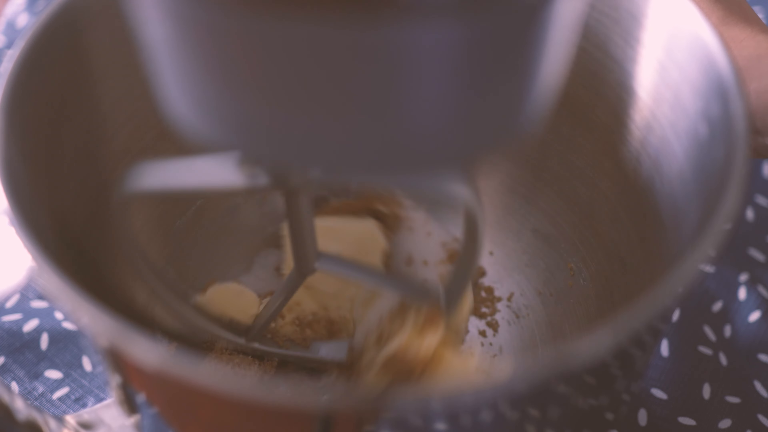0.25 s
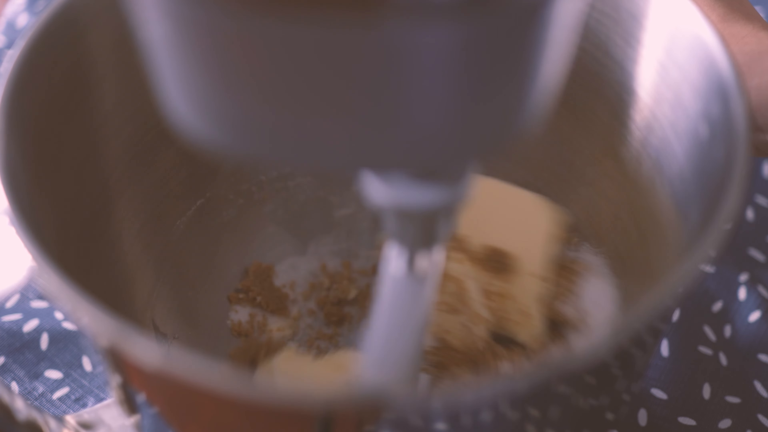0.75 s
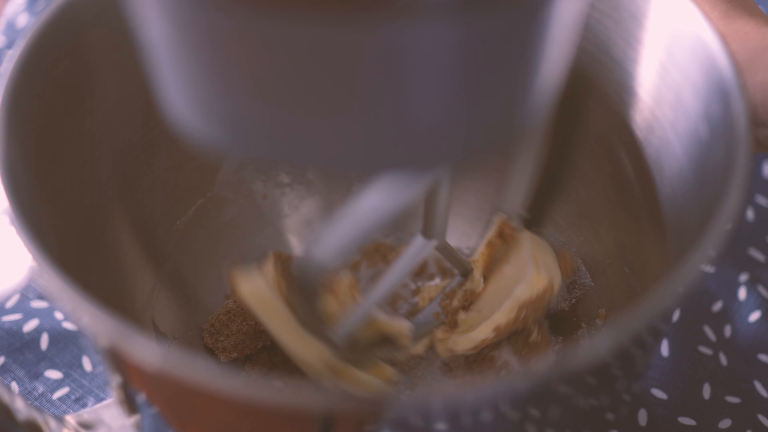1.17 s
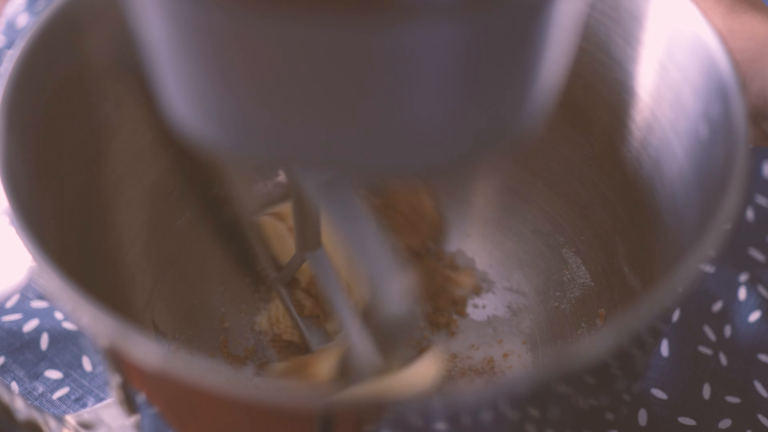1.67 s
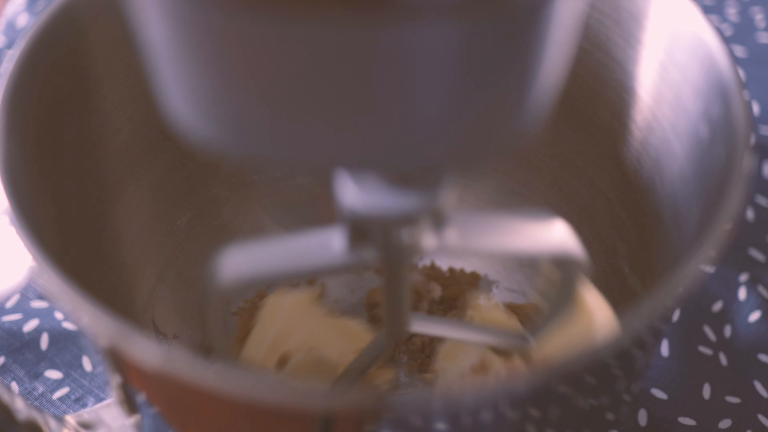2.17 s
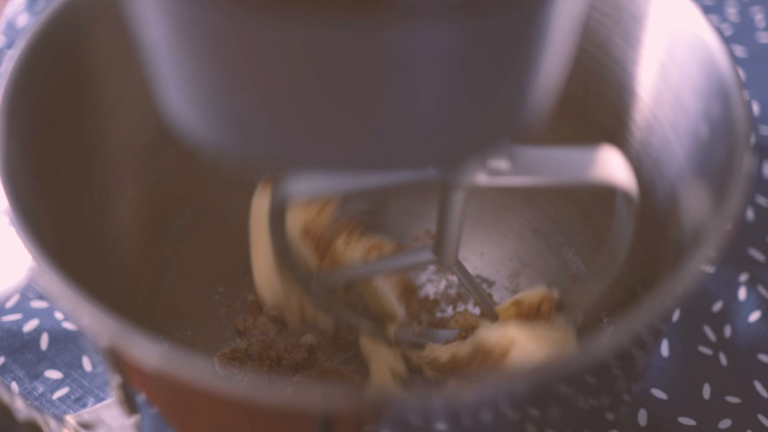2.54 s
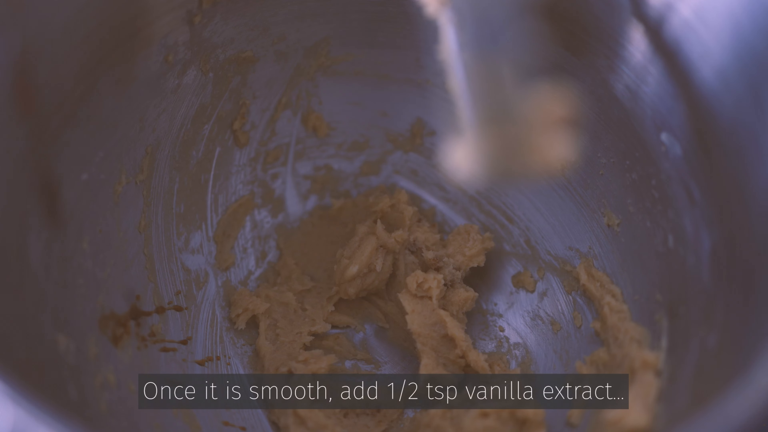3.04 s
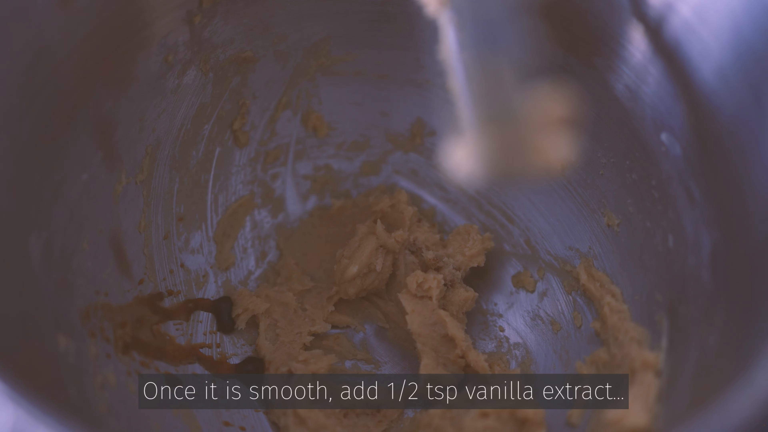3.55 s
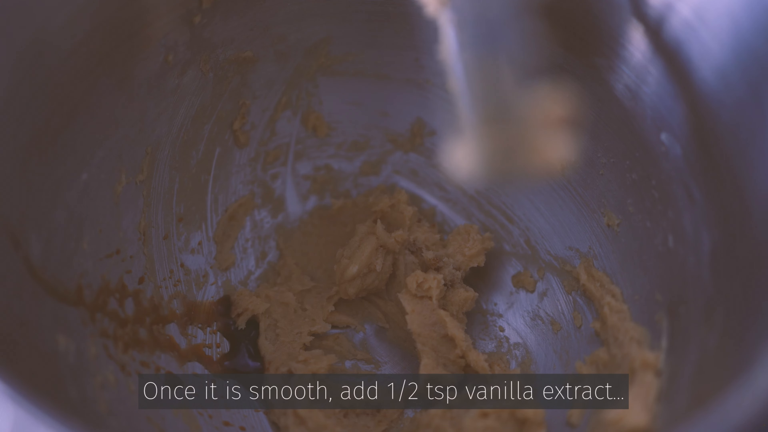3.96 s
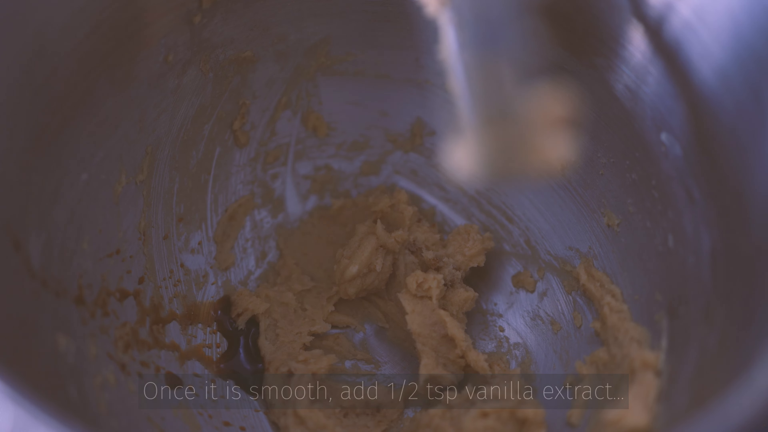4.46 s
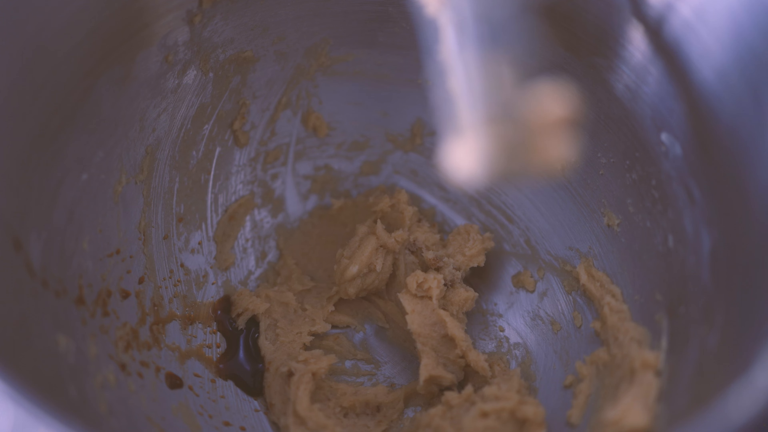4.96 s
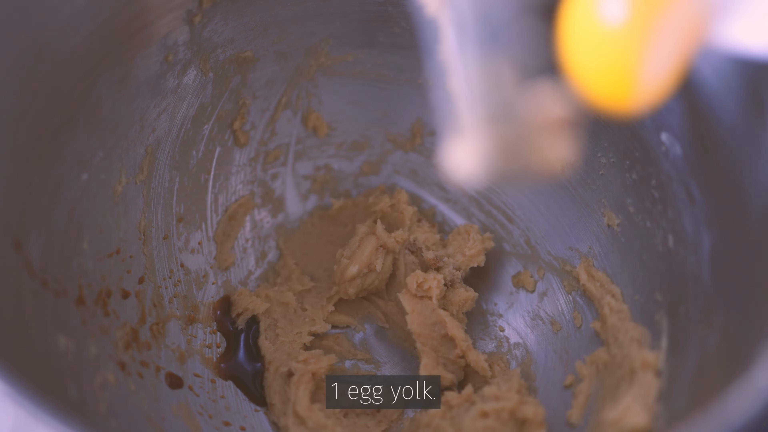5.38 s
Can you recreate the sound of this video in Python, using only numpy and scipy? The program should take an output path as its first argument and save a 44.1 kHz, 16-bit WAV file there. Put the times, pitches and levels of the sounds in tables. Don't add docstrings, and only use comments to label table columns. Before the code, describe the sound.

An electric mixer runs for the first half, its geared motor growling under load while sugar crystals crackle and rasp along the metal bowl in irregular strokes. An instant cut leaves a quiet room. A short flurry of small liquid spatters follows, thinning to stray drips, then a barely audible rising squeak and a hard little knock at the end. Close microphone with crisp, peaky treble.

```python
import sys
import numpy as np
from scipy import signal
from scipy.fft import rfft, irfft, next_fast_len
from scipy.io import wavfile
from scipy.ndimage import uniform_filter1d, map_coordinates

SR = 44100
rng = np.random.default_rng(int(sys.argv[2]) if len(sys.argv) > 2 else 0)


def transcribe(u):
    v = np.clip(np.atleast_2d(u).T, -1, 1)
    q = np.round(v * 32767).astype(np.int16)
    wavfile.write(sys.argv[1], SR, q)


def gain_from_decibels(decibels):
    exponent = np.asarray(decibels, float) / 20
    return 10 ** exponent


N = 247401
TIME = np.arange(N) / SR
# (frequency [Hz], width [Hz], level [dB])
BOWL = [(404.4, 45, 11.5)]


def paddle():
    # (time [s], level [dB], length [s],
    # coarse grains [dB], fine grains [dB])
    sweeps = [(0.0, -34, 0.078, -4.5, 3), (0.209, -36, 0.032, 2.5, 3.5), (.312, -29.5, .011, 5, -2),
              (0.345, -25, 0.032, 6, -4), (.46, -31.5, .012, 0.5, -2), (0.39, -30, 0.036, -7, -3),
              (0.516, -28.5, 0.066, -3.5, -4.5), (0.594, -37.5, 0.087, -1, -2.5),
              (0.724, -27.5, 0.047, 0.5, -1.5), (0.797, -20.5, 0.047, -2, -0.5),
              (0.885, -32, 0.067, -2.5, 0), (1.001, -31.5, 0.034, 1.5, -3), (1.076, -30, 0.047, -3, -3.5),
              (1.141, -37, 0.058, 7.5, 1), (1.374, -43.5, 0.06, 5.5, 4), (1.435, -31.5, .01, 2.5, 3.5),
              (1.465, -29, 0.03, 3.5, 2), (1.51, -25, 0.042, -8.5, -1.5), (1.657, -36.5, 0.056, -5.5, 0.5),
              (1.78, -35, 0.061, 7, 2), (1.888, -30.5, 0.027, 5, 0.5), (1.96, -29, 0.049, 3.5, -2.5),
              (2.076, -41, 0.076, 7, 0.5), (2.249, -35.5, 0.061, 4, -3.5), (2.352, -31, .009, 0.5, 2),
              (2.38, -28.5, 0.022, -2.5, -0.5), (2.427, -26, 0.056, -1, -4.5),
              (2.527, -38, 0.045, -0.5, -4), (2.63, -41, 0.034, 7.5, -4.5)]
    # (time [s], length [s], rub level [dB], boom level [dB])
    rubs = [(.01, 0.045, -48, -45.5), (0.228, 0.011, -37, -39.5), (0.303, 0.047, -36.5, -40.5),
            (0.492, 0.026, -44, -45), (0.823, 0.047, -36.5, -47), (0.909, 0.031, -37.5, -49),
            (1.04, 0.049, -71.5, -47), (1.155, 0.038, -40, -43.5), (1.243, 0.018, -54, -51.5),
            (1.39, 0.023, -35, -45.5), (1.475, 0.032, -46, -38.5), (1.832, 0.074, -35.5, -50.5),
            (1.957, 0.013, -73, -42.5), (2.075, 0.035, -35, -50.5), (2.28, 0.048, -39.5, -59),
            (2.38, 0.013, -51.5, -40.5), (2.556, 0.14, -42, -58.5)]
    # (time [s], ring [Hz], level [dB], length [s])
    lump_hits = [(0.346, 1090, -42, 0.044), (.33, 1650, -37.5, .035), (2.555, 1520, -41.5, .02),
                 (0.41, 1900, -39.5, .03), (0.837, 1070, -34, 0.074), (0.93, 1600, -35, .035),
                 (.805, 1620, -36, .02), (2.25, 1100, -41, .05), (1.023, 780, -33, 0.028),
                 (1.376, 1290, -36, .016), (1.634, 1580, -40.5, 0.047), (1.83, 1550, -45.5, 0.051),
                 (3.3, 1400, -46.5, 0.036), (4, 1600, -45.5, 0.059), (2.9, 4550, -39, .025),
                 (2.14, 4550, -42, .03), (2.24, 4550, -42.5, .04), (1.89, 6000, -37.5, .02),
                 (2.1, 1100, -41, 0.03), (1.451, 3830, -35.5, 0.053), (0.9, 4460, -36.5, 0.034),
                 (1.323, 5500, -35.5, 0.034)]
    # (time [s], level [dB], length [s])
    stroke_times = [
        (0.2, -40.5, 0.036),
        (0.329, -32, 0.037),
        (0.452, -31, 0.019),
        (1.212, -38, 0.011),
        (1.381, -34.5, 0.025),
        (2.371, -34.5, 0.0067),
        (2.439, -38, 0.032),
    ]
    # (time [s], level [dB], length [s])
    skid_times = [(0.022, -47, 0.029), (0.211, -36.5, 0.039), (.66, -39.5, .025), (.81, -38, .03),
                  (0.946, -38.5, 0.045), (1.105, -41, 0.0071), (1.456, -42.5, 0.055), (1.897, -37, .025),
                  (2.012, -39.5, .025), (2.278, -44, .05), (2.442, -31, .035), (2.551, -43, 0.034)]
    # (time [s], peak [dB], ring [Hz])
    crystal_snaps = [(0.208, -16.5, 7600), (0.3033, -13, 7550), (0.455, -11.5, 7530), (0.5073, -4, 7630),
                     (0.1605, -21.5, 7700), (0.2693, -17, 6900), (0.6549, -19.5, 7920), (0.7143, -13, 7480),
                     (0.9877, -14.5, 7650), (1.0665, -8.5, 8100), (1.1295, -17, 8000), (1.305, -19.5, 6470),
                     (1.4256, -17.5, 7500), (1.4347, -8.5, 6730), (1.7664, -18.5, 7440),
                     (1.8657, -14.5, 7650), (1.941, -12, 7800), (1.9954, -18.5, 8100), (2.172, -15.5, 7400),
                     (2.2119, -16, 7700), (2.3448, -16, 6800), (2.6219, -18.5, 7580)]
    # (time [s], peak [dB], ring [Hz])
    wall_ticks = [(.301, -27.5, 4360), (.452, -21, 4530), (.794, -20, 1560), (1.02, -15.5, 840),
                  (1.035, -25.5, 3230), (1.207, -23, 1510), (1.364, -24, 1270), (1.384, -24, 1290),
                  (1.47, -26, 398), (1.623, -21, 4630), (1.883, -24, 3960), (2.002, -26, 4580),
                  (.386, -19.5, 1070), (1.107, -26.5, 1410), (1.81, -25.5, 1280), (2.066, -21.5, 1080),
                  (1.208, -25.5, 2600), (2.37, -24, 4200), (2.369, -26, 1500), (2.369, -23.5, 3330)]
    # (frequency [Hz], level [dB per Hz])
    scrape_colour = [(530, -39.5), (900, 0), (982, 2.5), (1170, -2.5), (1320, -2), (1430, -8), (1590, 1.5),
                     (1710, -2.5), (2140, -5.5), (2700, -11.5), (3510, -39.5), (5940, -120)]
    rasp_colour = [(1410, -34.5), (2400, -9), (2900, -3.5), (3150, -4.5), (3890, -1.5), (4830, -3),
                   (5400, 0.5), (7020, -35.5), (11900, -120)]
    sugar_colour = [(3600, -59.5), (5800, -23.5), (6600, -11), (7250, -2), (7650, 1), (8050, -2),
                    (8600, -9), (9800, -18), (12000, -40)]
    coarse_colour = [(2800, -44.5), (4800, -20), (5500, -8), (6250, 0.5), (6800, -1.5), (7500, -20),
                     (9000, -60)]
    fine_colour = [(6500, -59), (8500, -6.5), (9500, 0), (10500, -3.5), (14000, -9), (15600, -15.5)]
    skid_colour = [(2500, -51), (3600, -9), (4000, 0.5), (4600, 0.5), (5300, -1.5), (6000, -11),
                   (8000, -49)]
    stroke_colour = [(500, -34.0), (1100, 1.5), (5000, 1.5), (7000, -21.5)]

    grind_db = -36
    s, db, span, coarse_db, fine_db = np.transpose(sweeps)
    swing, coarse, fine = [1 + bumps(s, db + more_db - grind_db, span) for more_db in (0, coarse_db, fine_db)]
    s, span, rub_db, boom_db = np.transpose(rubs)
    rub = bumps(s, rub_db - 7.0, span)
    clumps = wobble(45)

    (air_hz, air_width, _), = BOWL
    air = np.sin(2 * np.pi * np.cumsum(air_hz + 0.38 * air_width * wobble(35)) / SR)
    air = unit(gain_from_decibels(1.8 * wobble(30)) * air + 0.55 * unit(resonant(rng.standard_normal(N), BOWL)))
    boom = (gain_from_decibels(-51.5) + bumps(s, boom_db, span)) * air

    scrape = (gain_from_decibels(-43.5) * swing ** 0.048 + rub) * gain_from_decibels(0.9 * wobble(30))
    scrape = scrape * unit(coloured(grit(900, spread_db=0.5, smooth=0.9, patchy_db=2.0), scrape_colour))
    rasp = (gain_from_decibels(-42) * swing ** 0.28 + 0.64 * rub) * gain_from_decibels(1.1 * clumps)
    rasp = rasp * unit(coloured(grit(2500, spread_db=-4.5, smooth=1.0, patchy_db=1.5), rasp_colour))

    sugar = 0
    for level, colour in [(swing, sugar_colour), (gain_from_decibels(-6.5) * coarse, coarse_colour), (gain_from_decibels(-9.5) * fine, fine_colour)]:
        crystals = grit(4000, spread_db=0.8, smooth=0.74, patchy_db=1.58)
        sugar = sugar + level * unit(coloured(crystals, colour))
    sugar = gain_from_decibels(grind_db + 0.62 * clumps) * sugar

    lumps = 0
    for s, hz, db, span in lump_hits:
        peak = signal.iirpeak(hz, hz / (45 + 0.035 * hz), SR)
        lumps = lumps + bumps(s, db, span) * unit(signal.lfilter(*peak, rng.standard_normal(N)))

    stroke_grit = grit(1500, spread_db=0.0, smooth=0.7, patchy_db=0.5)
    strokes = bumps(*np.transpose(stroke_times)) * unit(coloured(stroke_grit, stroke_colour))
    skid_grit = grit(2000, spread_db=-0.5, smooth=0.66, patchy_db=3.0)
    skids = bumps(*np.transpose(skid_times)) * unit(coloured(skid_grit, skid_colour))
    hits = snaps(crystal_snaps, t60=0.014, fuzz=0.06) + snaps(wall_ticks, t60=0.018, fuzz=0.12)
    return skids + strokes + boom + scrape + rasp + sugar + lumps + hits


def motor():
    # (multiple [-], level [dB rms])
    orders = [(2, -79), (4, -62.5), (10, -56), (12, -45), (13, -50.5), (14, -50), (16, -50.5), (31, -59),
              (33, -58), (34, -60)]
    # (frequency [Hz], level [dB rms], wander [Hz], tie to the pinion [Hz per Hz])
    gears = [(172, -62.5, 2, .45), (511, -59.5, 6.5, 0.13)]
    # (time [s], mesh [Hz])
    pinion = [(0, 635), (.2, 655), (.3, 645), (.5, 662), (.8, 680), (.93, 672), (1.08, 628), (1.2, 640),
              (1.4, 685), (1.48, 655), (1.6, 672), (1.85, 688), (2.1, 678), (2.3, 655), (2.4, 622),
              (2.64, 642)]
    # (time [s], level [dB], length [s])
    jolts = [
        (.1, -59, 0.12),
        (.47, -62, 0.061),
        (1.025, -59, 0.053),
        (1.448, -55, 0.034),
        (1.844, -69, 0.1),
        (2.215, -47, 0.011),
        (2.32, -61, 0.15),
        (2.602, -72, 0.048),
    ]
    # (frequency [Hz], level [dB per Hz])
    housing_colour = [(260, -25.5), (450, -10.5), (471, -12), (621, -9), (718, 2.5), (879, -3), (958, -8.5),
                      (1100, -8.5), (1430, -38.5), (2420, -120)]
    thump_colour = [(26, -51.5), (45, -26), (130, -18.5), (167, 1), (205, -10.5), (232, 1), (312, -5),
                    (340, 1), (440, -26.5), (750, -120)]
    mains_hz, free_hz = 60.02, 685

    hum = 0
    for k, db in orders:
        hum = hum + gain_from_decibels(db + 2 + 2.4 * wobble(6.6)) * np.sin(2 * np.pi * (k * mains_hz * TIME + rng.random()))

    mesh_hz, = curves(pinion)
    load = (1 - mesh_hz / free_hz) * 12
    tones = 0
    for hz, db, drift, tied in gears:
        pitch = hz + drift * wobble(9) + tied * (mesh_hz - mesh_hz.mean())
        growl_db = 7 * np.minimum(load, 0.6)
        tones = tones + gain_from_decibels(db - 1.5 + growl_db + 3.9 * wobble(8)) * np.sin(2 * np.pi * np.cumsum(pitch) / SR)

    turn = 2 * np.pi * np.cumsum(mesh_hz) / SR
    ripple = 4 * np.pi * mains_hz * TIME
    loss_db = 26 * load ** 6
    mesh = gain_from_decibels(-loss_db) * np.sin(turn) + gain_from_decibels(-1.5) * np.sin(turn + ripple)
    mesh = mesh + gain_from_decibels(-11.5 - loss_db) * np.sin(turn - ripple)
    mesh = gain_from_decibels(-44.5 + 2.0 * wobble(14)) * mesh

    chop = 1 + 0.4 * np.sin(ripple)
    roar = gain_from_decibels(-45.5 + 0.91 * wobble(6.4)) * unit(coloured(chop * rng.standard_normal(N), housing_colour))
    shake = gain_from_decibels(-61) + bumps(*np.transpose(jolts))
    return hum + tones + mesh + roar + shake * unit(coloured(rng.standard_normal(N), thump_colour))


def spatter():
    # (time [s], peak [dB], low edge [dB])
    drips = [(3.006, -41, -34), (3.041, -42.5, -14.5), (3.0467, -57.5, -16), (3.0494, -53, -23),
             (3.107, -38, -26), (3.114, -54, -26), (3.1336, -45.5, -25), (3.137, -40, -27),
             (3.141, -39.5, -20), (3.149, -50, -17), (3.1521, -40, -27), (3.1575, -56, -21),
             (3.1703, -39.5, -28), (3.176, -34, -34), (3.1798, -50, -27), (3.2159, -37.5, -18),
             (3.2235, -48, -26), (3.228, -50, -22), (3.2726, -37, -9.5), (3.2769, -44, -19),
             (3.2816, -46.5, -20), (3.2894, -59.5, -17), (3.2935, -45, -24), (3.3112, -36.5, -29),
             (3.3377, -44, -12), (3.3855, -50, -9), (3.3889, -42.5, -16), (3.398, -49, -14),
             (3.4104, -41.5, -23), (3.4153, -51.5, -18), (3.4404, -52, -19), (3.4444, -53.5, -19),
             (3.4515, -31.5, -26), (3.4576, -49.5, -29), (3.465, -54, -24), (3.4691, -57, -22),
             (3.4966, -34.5, -31), (3.5039, -40, -12), (3.5118, -52, -20), (3.5148, -52.5, -21),
             (3.5422, -39.5, -27), (3.5476, -50, -26), (3.5749, -45, -17), (3.58, -49, -20),
             (3.5872, -35, -28), (3.5912, -39, -26), (3.5965, -54, -27), (3.621, -36.5, -30),
             (3.6259, -41, -30), (3.6558, -43, -19), (3.6837, -57, -19), (3.7025, -46, -26),
             (3.7051, -42, -22), (3.7118, -56, -22)]
    # (time [s], peak [dB], ring
    # [Hz], low edge [dB])
    dregs = [(3.0041, -48, 7430, -34), (3.0867, -62, 7350, -25), (3.6195, -43.5, 7900, -28),
             (3.8318, -61, 6000, -21), (3.849, -62, 7400, -21), (3.9175, -62, 8300, -20.5),
             (3.9751, -64, 6630, -21.5), (3.9932, -59, 8100, -22), (4.0873, -64, 7860, -23.5),
             (3.784, -53, 5600, -12), (3.7236, -42, 7800, -24), (3.729, -37.5, 6330, -21),
             (3.735, -40, 6900, -20), (3.747, -35, 7830, -23), (3.7556, -38, 7600, -15),
             (3.7594, -43.5, 7440, -8), (3.7685, -40, 6370, -30), (3.79, -55, 7200, -13),
             (3.8391, -60, 8160, -10.5), (3.932, -53.5, 8680, -32), (3.982, -56, 7960, -15.5),
             (4.0931, -59.5, 7800, -14.5), (4.124, -67, 7560, -14), (4.6707, -63, 7970, -12.5),
             (5.439, -69, 9020, -3)]
    # (time [s], flow level [dB])
    pour = [
        (2.95, -90),
        (3.08, -87),
        (3.5, -79.5),
        (3.77, -70),
        (3.84, -78),
        (4.12, -83),
        (4.4, -80),
    ]
    # (time [s], peak [dB])
    plops = [(3.042, -58.5), (3.176, -68), (3.219, -58), (3.312, -62), (3.341, -58), (3.412, -60),
             (3.505, -64), (3.546, -60), (3.621, -60), (3.387, -55.5), (3.587, -54), (3.657, -56),
             (3.705, -54), (3.758, -71.5)]
    # (time [s], peak [dB], ring [Hz])
    pings = [(3.042, -58, 5230), (3.2161, -59, 4700), (3.2727, -42.5, 4700), (3.2731, -54.5, 3350),
             (3.3378, -59, 3400), (3.3882, -46.5, 4900), (3.2812, -54, 5600), (3.2935, -57, 6000),
             (3.4522, -53.5, 4470), (3.5037, -43.5, 5700), (3.4512, -39, 6750), (3.5745, -57.5, 5500),
             (3.7595, -45, 4010), (5.44, -73, 6480), (3.9318, -49, 8700)]
    # (time [s], peak [dB], ring [Hz])
    clicks = [
        (3.766, -28, 7000),
        (3.797, -68, 14000),
        (3.955, -68, 12000),
        (4.022, -70, 11000),
        (4.1245, -66, 13000),
    ]
    # (frequency [Hz], level [dB per Hz])
    wet_colour = [(880, -49), (1500, -32), (2950, -37), (3290, -29), (5530, -22), (6600, -3), (7800, -1),
                  (8690, -12), (9870, -11.5), (11000, -25), (15600, -39)]
    # (frequency [Hz], level [dB])
    low_colour = [(1000, -36), (2200, -10), (4500, -1.5), (6000, 7.5), (8000, -30)]
    high_colour = [(7000, -15.5), (10000, 8), (13000, 5), (15800, -3.5)]

    body, ring, low, high = np.zeros((4, N + SR))
    t = TIME[:SR // 16]
    luck = rng.random(len(drips))
    drops = [(s, db, 7830 * (1 + 0.05 * (d - 0.5)), low_db) for (s, db, low_db), d in zip(drips, luck)]
    decay = gain_from_decibels(-60 * t / 0.007) + gain_from_decibels(-9.5 - 60 * t / 0.027) + gain_from_decibels(-19.0 - 60 * t / 0.08806)
    fade = decay * (1 - np.exp(-t / 0.00046))
    for s, db, hz, low_db in drops + dregs:
        at = slice(round(s * SR), round(s * SR) + len(t))
        spray = gain_from_decibels(db) * fade * rng.standard_normal((3, len(t)))
        body[at] += spray[0]
        ring[at] += gain_from_decibels(db - 1.5 - 60 * t / 0.012) * (1 - np.exp(-t / 0.0002)) * np.sin(2 * np.pi * hz * t)
        low[at] += gain_from_decibels(low_db + 7.0) * spray[1]
        high[at] += gain_from_decibels(-0.3 * db - 30.5 - 60 * t / 0.06) * spray[2]
    splash = gain_from_decibels(6) * coloured(body, wet_colour) + ring + coloured(low, low_colour) + coloured(high, high_colour)

    flow_db, = curves(pour)
    wet = (TIME > pour[0][0]) * np.clip((pour[-1][0] - TIME) / 0.4, 0, 1)
    fizz = gain_from_decibels(flow_db) * unit(coloured(grit(900, spread_db=2.5, smooth=0.9, patchy_db=2.5), wet_colour))
    pouring = np.clip((3.77 - TIME) / 0.038 + 1, 0, 1)
    boom = pouring * gain_from_decibels(flow_db + 4 + 2.6 * wobble(4.55)) * unit(resonant(rng.standard_normal(N), BOWL))

    plopping = 0
    for s, db in plops:
        u = np.maximum(TIME - s, 0)
        swell = gain_from_decibels(-60 * u / 0.073) * (1 - np.exp(-u / 0.0013))
        plopping = plopping + gain_from_decibels(db) * swell * np.sin(2 * np.pi * 425 * u)
    ticking = snaps(clicks, t60=0.005, fuzz=0.5) + snaps(pings, t60=0.013, fuzz=0.2)
    return splash[:N] + ticking + plopping + wet * (fizz + boom)


def knock():
    # (time [s], peak [dB], bowl level [dB], t60 [s])
    knocks = [
        (5.543, -40.5, -48, .015),
        (5.546, -40.5, -55, 0.0152),
        (5.554, -22, -28, .012),
        (5.5565, -19.5, -56.5, .015),
    ]
    # (frequency [Hz], level [dB], t60 [s])
    rim = [(2380, -23, 0.024), (2840, -16.5, 0.023), (6240, -10, 0.0073), (8100, -17.5, 0.012)]
    belly = [(94, -16, 0.145), (416, 1, 0.076), (499, -11.5, 0.1)]
    # (frequency [Hz], level [dB per Hz])
    crack_colour = [(300, -25), (800, -28), (1900, -23), (2400, -7), (2900, 1.5), (4300, -1.5), (6500, 0.5),
                    (8300, -4), (10300, -18.5), (15600, -20.5)]
    crack, ring = np.zeros((2, N + SR))
    t = TIME[:SR // 8]

    def ringing(modes):
        return sum(gain_from_decibels(level - 60 * t / life) * np.sin(2 * np.pi * hz * t) for hz, level, life in modes)

    for s, db, bowl_db, t60 in knocks:
        at = slice(round(s * SR), round(s * SR) + len(t))
        fade = gain_from_decibels(-60 * t / t60) + gain_from_decibels(-27.0 - 60 * t / 0.2)
        crack[at] += gain_from_decibels(db - 1.5) * fade * rng.standard_normal(len(t))
        ring[at] += gain_from_decibels(db) * ringing(rim) + gain_from_decibels(bowl_db) * (1 - np.exp(-t / 0.0019)) * ringing(belly)
    return coloured(crack[:N], crack_colour) + ring[:N]


def squeak():
    # (time [s], low whistle [Hz], high whistle [Hz], pressure [dB])
    slide = [
        (5.109, 2920, 4700, -78),
        (5.165, 3050, 4810, -78.5),
        (5.19, 3100, 4850, -68.5),
        (5.23, 3310, 4900, -71),
        (5.247, 3370, 5020, -100),
        (5.28, 3320, 5150, -75.5),
        (5.32, 3470, 5720, -79),
        (5.36, 3465, 5950, -79.5),
        (5.412, 3470, 5810, -86),
    ]
    # (frequency [Hz], level [dB])
    hiss_colour = [(600, -30.5), (1100, -7.5), (1700, -3), (2600, -5), (6000, -12), (7000, -5.5),
                   (9200, -3.5), (10000, -15), (15000, -16.5)]
    # (frequency [Hz], width [Hz])
    low_note = (3360, 140)

    def whistle(hz, db):
        return gain_from_decibels(db - 3 + 4.5 * wobble(70)) * np.sin(2 * np.pi * np.cumsum(hz + 65 * wobble(300)) / SR)

    low_hz, high_hz, press_db = curves(slide)
    touch = np.clip(np.minimum(TIME - slide[0][0] + 0.0122, slide[-1][0] + 0.013 - TIME) / 0.012, 0, 1)
    hiss = gain_from_decibels(press_db) * unit(coloured(rng.standard_normal(N), hiss_colour))
    hiss = hiss + whistle(1750, press_db - 5.5) + whistle(9200, press_db - 9)
    low_db = press_db + 2.5 - ((low_hz - low_note[0]) / low_note[1]) ** 2
    high_db = press_db - 3.0 + 0.0035 * (high_hz - 4800)
    return touch * (whistle(low_hz, low_db) + whistle(high_hz, high_db) + hiss)


def kitchen():
    # (frequency [Hz], level [dB per Hz])
    room_colour = [(12, -48.5), (30, -20), (90, -14), (122, -6.5), (176, -11.5), (260, -5), (307, -17),
                   (363, -9.5), (507, -22.5), (652, -21.5), (709, -26.5), (771, -25.5), (2160, -33.5),
                   (7800, -38.5), (12500, -40), (14500, -38), (15600, -41)]
    return gain_from_decibels(-68 + 0.63 * wobble(5.06)) * unit(coloured(rng.standard_normal(N), room_colour))


def snaps(events, t60, fuzz):
    out, t = np.zeros(N + SR), TIME[:SR // 25]
    for s, db, hz in events:
        ring = np.sin(2 * np.pi * hz * t) + fuzz * np.diff(rng.standard_normal(len(t) + 1))
        out[round(s * SR):][:len(t)] += gain_from_decibels(db - 1 - 60 * t / t60) * (1 - np.exp(-t / 0.0006)) * ring
    return out[:N]


def grit(rate, spread_db, smooth, patchy_db):
    cracks, count = np.zeros(N), int(rate * N / SR)
    size_db = spread_db * np.minimum(rng.exponential(size=count), 2.5)
    cracks[rng.integers(N, size=count)] = gain_from_decibels(size_db) * rng.standard_normal(count)
    z = signal.stft(unit(cracks) + smooth * rng.standard_normal(N), nperseg=512)[2]
    field = uniform_filter1d(rng.standard_normal(z.shape), size=3, axis=0)
    field = uniform_filter1d(field, size=5, axis=1)
    return signal.istft(z * gain_from_decibels(patchy_db * unit(field)), nperseg=512)[1][:N]


def bumps(s, db, span):
    coarse = TIME[::16, None]
    swells = gain_from_decibels(db) * np.exp(-((coarse - s) / span) ** 2)
    return np.interp(TIME, coarse[:, 0], swells.sum(axis=1))


def wobble(rate):
    coarse = TIME[::16]
    knots = rng.standard_normal(int(N * rate / SR) + 4)
    return np.interp(TIME, coarse, map_coordinates(knots, [coarse * rate]))


def curves(rows):
    s, *cols = np.transpose(rows)
    return [np.interp(TIME, s, c) for c in cols]


def unit(x):
    return x / np.sqrt(np.mean(x ** 2) + 1e-20)


def coloured(x, spectrum):
    m = 2 * next_fast_len(len(x) // 2 + 4096)
    f, level = np.transpose(spectrum)
    gain = gain_from_decibels(np.interp(np.log(np.fft.rfftfreq(m, 1 / SR) + 1), np.log(f + 1), level))
    cep = irfft(np.log(gain + 1e-5), m)
    cep[1:m // 2] *= 2
    cep[m // 2 + 1:] = 0
    return irfft(rfft(x, m) * np.exp(rfft(cep)), m)[:len(x)]


def resonant(x, modes):
    m = next_fast_len(N + SR // 2)
    f = np.fft.rfftfreq(m, 1 / SR)
    response = sum(gain_from_decibels(db) * 1j * f * w / (c * c - f * f + 1j * f * w) for c, w, db in modes)
    return irfft(rfft(x, m) * response, m)[:N]


def scene():
    running = np.clip((2.6425 - TIME) / 0.00067, 0, 1)
    mixer = coloured(paddle() + motor(), [(40, -34.5), (85, -2.0), (20000, -0.5)])
    return (running * mixer + spatter() + knock() + squeak() + kitchen())[None]


def flicker(x):
    tops = [signal.sosfiltfilt(signal.butter(8, hz, "high", fs=SR, output="sos"), x) for hz in (13000, 14700)]
    faint = uniform_filter1d(np.abs(tops[0]), size=500) < gain_from_decibels(-84)
    busy = 1.6 * (abs(TIME - 3.35) < 0.4)
    frames = (np.arange(N) + 416) // 1024 * 1024 % N
    shut = []
    for lean in (-1.1, 0.8):
        closed = faint * (wobble(16)[frames] + lean + busy > 0)
        shut.append(uniform_filter1d(closed * 1.0, size=150))
    return x - shut[0] * tops[0] - (1 - shut[0]) * shut[1] * tops[1]


def low_pass(x):
    return signal.sosfilt(signal.butter(12, 15800, fs=SR, output="sos"), x)


def record(dry):
    m = 2 * next_fast_len(N // 2 + 2048)
    below_top = np.fft.rfftfreq(m, 1 / SR) < 15800
    kept = irfft(rfft(flicker(dry[0])[None], m) * below_top, m)[:, :N]
    return low_pass(kept)


dry = scene()
out = record(dry)
transcribe(out)
```